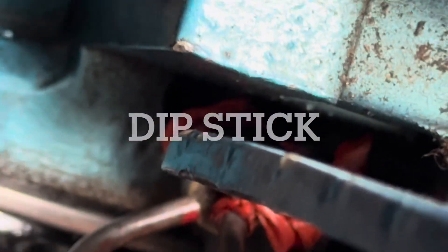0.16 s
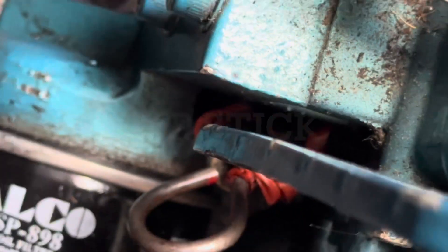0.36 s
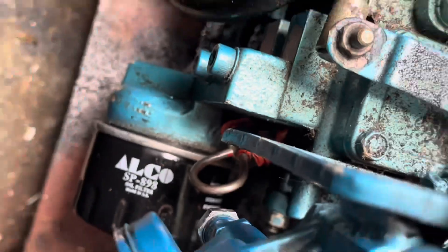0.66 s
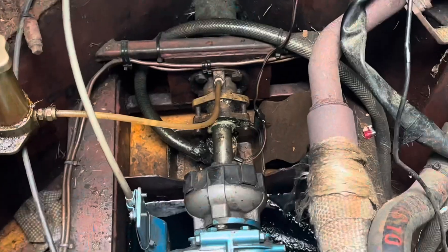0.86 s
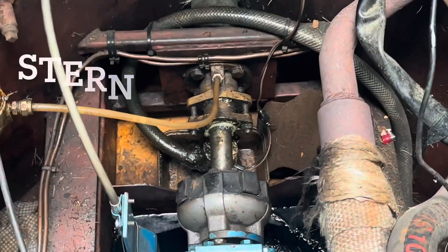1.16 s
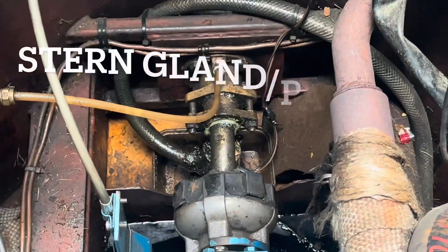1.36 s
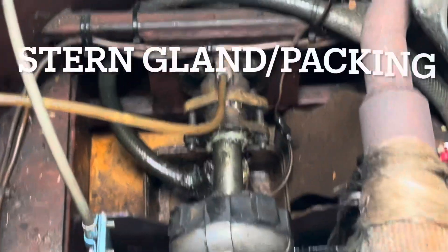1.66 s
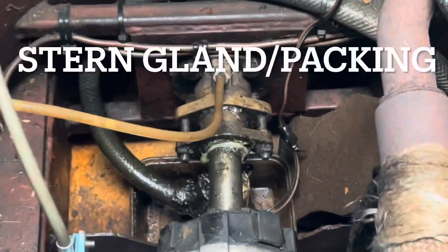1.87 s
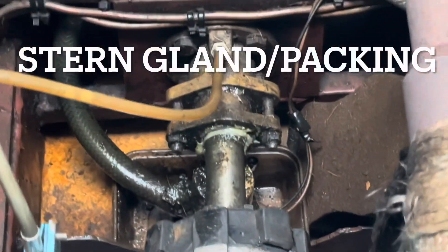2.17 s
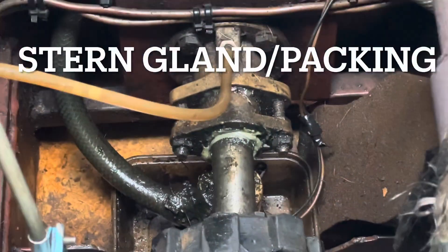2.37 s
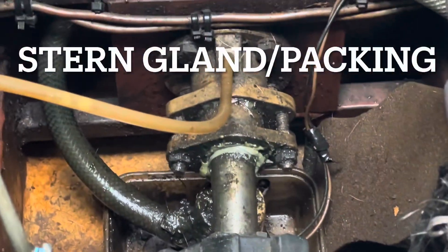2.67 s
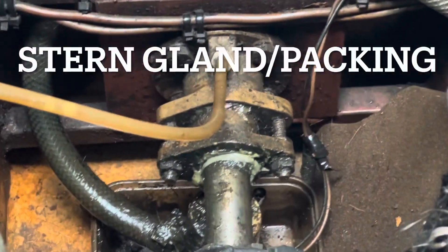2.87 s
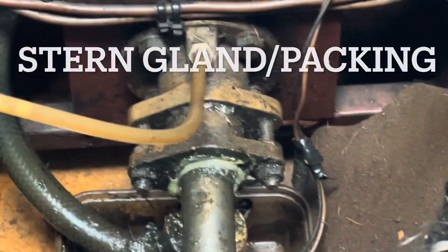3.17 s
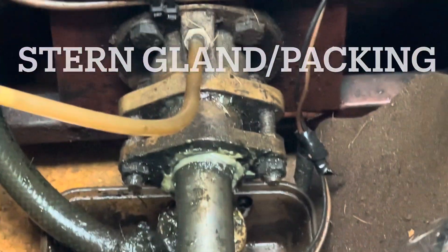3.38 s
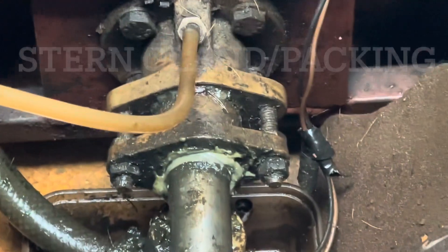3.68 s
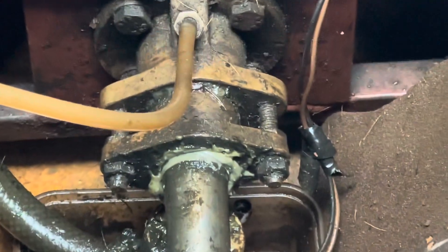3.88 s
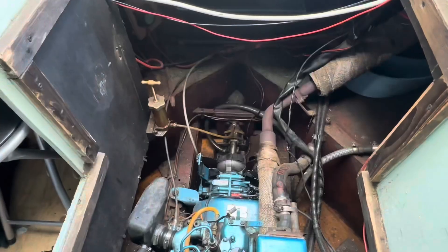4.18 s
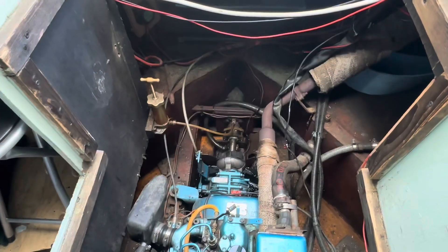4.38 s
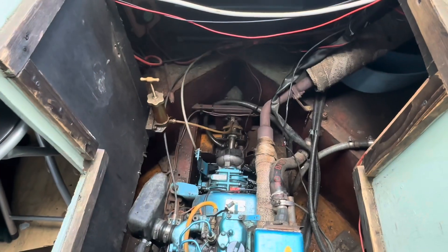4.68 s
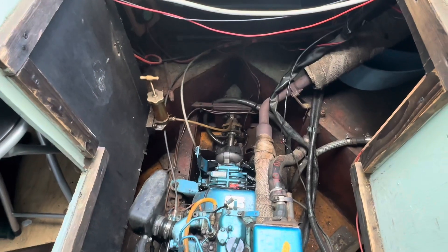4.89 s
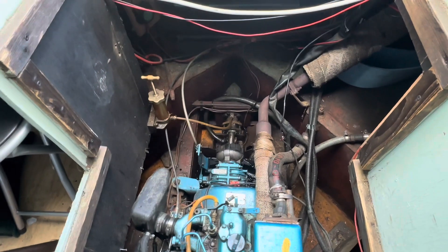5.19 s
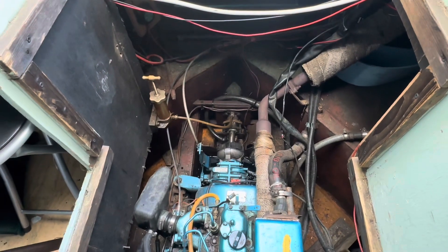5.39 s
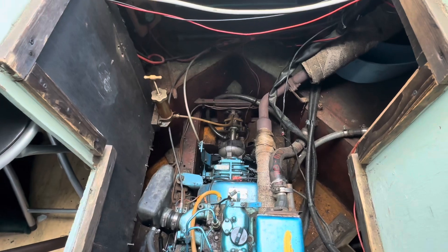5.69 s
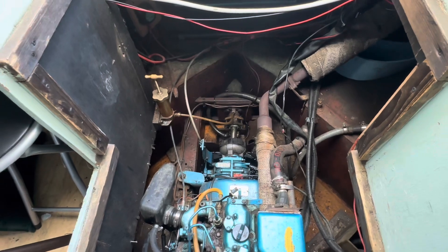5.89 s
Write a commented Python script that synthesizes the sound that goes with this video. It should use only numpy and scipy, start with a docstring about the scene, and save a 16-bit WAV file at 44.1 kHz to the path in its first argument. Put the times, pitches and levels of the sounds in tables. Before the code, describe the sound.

Close stereo microphone in a cramped boat engine bay. A small diesel runs steadily, first booming with dull knocks and bright valve ticks, then abruptly drier and more clattery with faint droning panels. Another cut moves above the hatch, where the engine runs down in slower uneven strokes, whirring, rocking and booming, a loose steel part clanking, before a sinking gear hum and light taps settle almost to silence.

```python
"""In a boat's engine bay a small marine diesel idles, heard beside the block, over the shaft, then from above the hatch.
At idle each beat throbs the hull and fires a set pattern of knocks, rings and valve ticks: filtered noise and modes.
As it stops, the blows spread out over whirr and whine, the engine rocks on its mounts and a loose steel part clanks.
Light taps and a falling hum of the gear lead to rest."""
import sys
import numpy as np
from scipy import signal
from scipy.fft import rfft, irfft
from scipy.io import wavfile
from scipy.ndimage import uniform_filter1d

SR = 44100
rng = np.random.default_rng(int(sys.argv[2]) if len(sys.argv) > 2 else 0)


def store_pcm(level_fs):
    """Save levels as 16-bit WAV."""
    pcm = np.round(np.clip(level_fs, -1, 1) * 32767).astype(np.int16)
    wavfile.write(sys.argv[1], SR, np.atleast_2d(pcm).T)


N = 266787
T = np.arange(N) / SR


def undb(db):
    """Decibels to gain."""
    return 10 ** (np.asarray(db) / 20)


def curve(rows):
    """Each column of a table, joined by straight lines in time."""
    s, *columns = np.transpose(rows)
    return [np.interp(T, s, c) for c in columns]


def unit(x):
    """Scale to rms 1."""
    return x / np.sqrt(np.mean(x ** 2))


def causal(gain):
    """Response of a passive body with these gains: it rings after a blow, never before."""
    cepstrum = irfft(np.log(gain))
    half = len(cepstrum) // 2
    cepstrum[1:half] *= 2
    cepstrum[half + 1:] = 0
    return np.exp(rfft(cepstrum))


def colour(x, points, size=4096):
    """Filter by (frequency [Hz], level [dB]) points, keeping the power of white noise."""
    hz, db = np.transpose(points)
    grid = np.linspace(1, SR / 2, size // 2 + 1)
    grid_db = np.interp(np.log(grid), np.log(hz), db, left=db[0] + 6.5, right=db[-1] - 29.5)
    response = irfft(causal(undb(grid_db)))
    response = response / np.linalg.norm(response)
    return signal.fftconvolve(x, response[None])[:, :N]


def noise(width, size=N):
    """Stereo noise; width is side over mid."""
    mid, side = rng.standard_normal((2, size))
    return np.array([mid + width * side, mid - width * side])


def strike(times, db, response):
    """Lay a response down at each time, into both channels."""
    out, length = np.zeros((2, N + 2 * SR)), response.shape[1]
    for t, gain in zip(times, undb(db)):
        i = int((t + 1) * SR)
        out[:, i:i + length] += gain * response[:, :length]
    return out[:, SR:SR + N]


def rattle(times, db, points, t60, tail_db, tail_t60, rise_s, alike, width):
    """Blows on a casting with countless modes, then the bay's echo; a share of the ring is alike at every blow."""
    t = T[:SR // 3]
    casting = undb(-120 * t / t60)
    echo = undb(2 * tail_db - 120 * t / tail_t60)
    power = (casting + echo) * (1 - np.exp(-t / rise_s)) ** 2
    same = strike(times, db, np.sqrt(power) * noise(width, size=len(t)))
    fresh = np.sqrt(strike(times, 2 * db, power[None])) * noise(width)
    alike = np.clip(alike, 0, 1)
    return colour(np.sqrt(alike) * same + np.sqrt(1 - alike) * fresh, points)


def ring(modes, spread, rise_s):
    """Decaying modes; each reaches the two ears up to spread radians apart."""
    t = T[:SR // 2]
    out = 0
    for k, (hz, db, t60) in enumerate(modes):
        apart = (-1) ** k * spread * np.array([[.5], [-.5]])
        phase = rng.uniform(0, 2 * np.pi) * min(spread, 1) ** 2 + apart
        out = out + undb(db - 60 * t / t60) * np.sin(2 * np.pi * hz * t + phase)
    return out * (1 - np.exp(-t / rise_s)) / np.linalg.norm(undb(np.array(modes)[:, 1]))


def walk(rate):
    """Slow chance with a spread near 1, drawn afresh rate times a second and smoothed."""
    k = int(SR / rate)
    steps = np.repeat(rng.standard_normal(N // k + 1), k)
    return 1.348 * uniform_filter1d(uniform_filter1d(steps, k), k)[:N]


def wavering_tone(hz, wander, rate):
    """A sine whose pitch strays by chance."""
    return np.sin(2 * np.pi * np.cumsum(hz * (1 + wander * walk(rate))) / SR)


def shot(start, end, fade_s=0.029):
    """One listening spot fades in and out."""
    return np.clip(np.minimum(T - start, end - T) / fade_s + .5, 0, 1)


# hull throb at each spot: (multiple of the beat rate, level [dB])
BLOCK_ORDERS = [(1, -37), (2, -33), (3, -19.5), (4, -17), (5, -14), (6, -16), (7, -15), (8, 4.5), (9, -2.5),
                (10, -15.5), (11, -19), (12, -30), (13, -25), (14, -24.5), (15, -38), (16, -40), (17, -40),
                (18, -21), (19, -40), (20, -41)]
SHAFT_ORDERS = [(1, -12.5), (2, -6), (3, 1.5), (4, 6), (5, 2), (6, -10), (7, -3.5), (8, 7), (9, 2.5),
                (10, -10.5), (11, -10), (12, -30.5), (13, 5), (14, -33.5), (15, -12), (16, -9), (17, -10),
                (18, -7), (19, -15), (20, -11)]


def throb(spot, orders, lead_s):
    """One push a beat rings the hull on multiples of the beat rate."""
    _, _, first, period = spot
    multiples, db = np.transpose(orders)
    response = causal(undb(np.interp(np.arange(2 * len(orders)), multiples, db)))
    turns = (T - first + lead_s) / period
    wave = sum((response[k] * np.exp(2j * np.pi * k * turns)).real for k in range(1, len(orders) + 1))
    return unit(wave) * undb(0.91 * walk(5.78))


# dull thuds of the mounts within one beat: (delay [s], pitch [Hz], length [s], level [dB])
BLOCK_THUDS = [(-.009, 434, 0.0053, -35.5), (.029, 277, .007, -38), (0.048, 333, 0.0028, -27),
               (0.057, 262, 0.0051, -48)]
SHAFT_THUDS = [(.033, 262, 0.0031, -40.5), (0.0471, 334, 0.003, -28)]


def thud(times, db, hz, length_s):
    """Soft pushes with hardly any ring: a few cycles under a bell-shaped swell."""
    half = SR // 40
    t = T[:2 * half] - T[half]
    push = -np.cos(2 * np.pi * hz * t) * np.exp(-(t / length_s) ** 2)
    return strike(times - T[half], db, push * np.ones((2, 1)))


# blows within one beat:
# (delay [s], casing level [dB], knock level [dB], ring level [dB], tick level [dB], tick pitch [Hz])
BLOCK_BLOWS = [(-.0005, -39.5, -33.5, -31, -31, 8800), (.007, -49, -64, -30, -42, 6400),
               (0.021, -47.5, -34, -40, -34, 9200), (0.0411, -45, -36, -42, -37, 6000)]
SHAFT_BLOWS = [(-.0005, -44, -46, -27, -36, 8050), (.002, -45.5, -33, -32.5, -32, 6350),
               (0.012, -51.5, -58, -29, -44, 3710), (0.0196, -41, -30.5, -49, -28, 8740),
               (.0232, -41.5, -31.5, -35, -42, 6150), (0.039, -40, -34, -45.5, -32, 4760)]
# beats given a set force, the others draw theirs: (time [s], relative force [dB])
HARD_BEATS = [(.231, 4), (.391, 3), (.55, 3.5), (.63, 3), (.8, 3), (.879, 3), (1.118, 1.5), (1.198, 2.5),
              (1.597, 2), (1.916, 2), (2.075, 4), (2.633, 5), (2.713, 4), (2.793, 4), (2.873, 4),
              (3.032, 4), (3.112, 4), (3.271, 3), (3.351, 4), (3.51, 3), (3.59, 4), (3.67, 4.5),
              (3.83, 3.5), (3.989, 3)]
# colours of the casing at each spot, the knock and the tick: (frequency [Hz], level [dB])
BLOCK_CASING = [(150, -12), (240, -14), (320, -9.5), (450, -10), (600, -7.5), (750, -12), (950, -12),
                (1300, -18.5), (1700, -12.5), (3000, -21)]
SHAFT_CASING = [(150, -8), (250, -9.5), (330, 0), (430, -8.5), (520, -5), (630, -7.5), (730, -12.5),
                (870, -7), (1040, -6), (1300, -15), (1700, -7.5), (3000, -9.5)]
KNOCK = [(800, -34), (1500, -24), (1850, -7.5), (2150, 2.5), (2500, 0.5), (2900, -1), (3600, -3.5),
         (4800, -9.5), (6500, -10.5), (10000, -46)]
TICK = [(2000, -30), (4200, -7.5), (5500, -11.5), (6600, 6.5), (7100, 5), (7450, -32), (7900, 4.5),
        (8900, 9.5), (9700, -3.5), (10500, -19.5), (11500, -24.5), (12900, 1), (15700, -5), (17000, -50)]
# ringing valves, block, piston slap and cover: (frequency [Hz], level [dB], t60 [s])
VALVE_MODES = [(5960, 0, 0.051), (7170, -1, 0.05), (8000, 3.5, 0.03), (9370, 10.5, 0.0093)]
BLOCK_MODES = [(891, -16, 0.22), (1037, -12, 0.23), (1865, 3, 0.05), (2047, -2.5, 0.12), (2227, 1.5, 0.1),
               (2480, -5.5, 0.048), (2780, -5, 0.14), (2960, -6.5, 0.17), (3120, -12, 0.24),
               (3904, -20, 0.33)]
SLAP_MODES = [(1851, 0.5, 0.041), (2030, -3, 0.048), (2062, -1, 0.13), (2172, -9, 0.076)]
COVER_MODES = [(543, -11.5, 0.023), (628, -1, 0.077)]
SLAP_FOLLOW = 2.6  # growth of the piston's slap, dB per dB of force
TAPPET_SCATTER_DB = 1.0


def clatter(spot, blows, casing, thuds, cover_db, slap_db):
    """Combustion and valve gear strike the block at near-fixed points of each beat; some beats knock harder."""
    _, end, first, period = spot
    beats, out = np.arange(first, end, period), 0
    hard_db = sum(db * (abs(beats - t) < period / 2) for t, db in HARD_BEATS)
    force_db = np.where(hard_db > 0, hard_db, 2.8 * rng.standard_normal(len(beats))) - 3.0
    for delay, casing_db, knock_db, ring_db, tick_db, tick_hz in blows:
        chance = rng.standard_normal((len(beats), 4)).T
        times = beats + delay
        loose = times + .00004 * chance[3]
        # the beat's force tells less on blows further from its start
        force = force_db * np.exp(-abs(delay) / 0.038) + 0.64 * chance[0]
        tick = tick_db + 1.27 * chance[2]
        out = out + rattle(times, casing_db + .5 * chance[1], casing, t60=0.024, tail_db=0.0,
                           tail_t60=0.44, rise_s=0.0012, alike=0.78, width=0.56)
        out = out + rattle(loose, knock_db - 3.0 + 0.13 * force, KNOCK, t60=0.037, tail_db=-8.0,
                           tail_t60=0.39, rise_s=0.00057, alike=0.89, width=0.093)
        out = out + rattle(times, tick, TICK, t60=0.02, tail_db=-13,
                           tail_t60=0.14, rise_s=0.00056, alike=1.0, width=0.67)
        # each tappet has a bright band of its own over the ring they share
        own = [(tick_hz * .7, -28), (tick_hz * .92, 0), (tick_hz * 1.05, 0), (tick_hz * 1.18, -30)]
        out = out + rattle(times, tick - 1.5 + TAPPET_SCATTER_DB * chance[1], own, t60=0.018, tail_db=-12,
                           tail_t60=0.092, rise_s=0.00036, alike=0.54, width=0.033)
        out = out + strike(times, tick - 5, ring(VALVE_MODES, spread=0.96, rise_s=0.00014))
        out = out + strike(loose, ring_db - 4.0 + force, ring(BLOCK_MODES, spread=1.0, rise_s=0.00024))
    # the piston's slap is heard mostly on hard beats
    slap = ring(SLAP_MODES, spread=0.48, rise_s=0.0053)
    out = out + strike(beats + 0.002018, slap_db + SLAP_FOLLOW * force_db, slap)
    # each firing rings a cover on the block, and the mounts thud as the engine rocks
    out = out + strike(beats, cover_db + 0.43 * force_db, ring(COVER_MODES, spread=0.41, rise_s=0.0021))
    return out + sum(thud(beats + delay, db + 0.1 * force_db, hz, length) for delay, hz, length, db in thuds)


# panels and covers that sing along over the shaft: (resonance [Hz], level [dB])
SHAFT_TONES = [(263, -48), (313, -55), (351, -58), (414, -57), (464, -68), (489, -64), (551, -60),
               (627, -54.5), (1041, -62), (1104, -64.5)]
DRONE_WAVER_DB = 1.0


def drone(spot, tones):
    """The steady beat keeps each panel singing on the multiple of the beat rate nearest to its resonance."""
    period, out = spot[-1], 0
    for hz, db in tones:
        multiple = np.round(hz * period)
        tone = np.sin(2 * np.pi * (multiple * T / period + rng.random()))
        out = out + undb(db + DRONE_WAVER_DB * walk(4.77)) * tone
    return np.sqrt(2) * out


# idle at each spot: (start [s], end [s], first beat [s], beat period [s])
BESIDE_BLOCK = (-.1, .745, -.0866, .0796)
OVER_SHAFT = (.772, 4.108, .7195, .07974)
# nearness to the shaft end: (time [s], throb level [dB], clatter level [dB])
SHAFT_LEVEL = [(.8, -34, -2.5), (1.5, -33.5, -2), (2.1, -32.5, -1), (2.8, -31.5, -1), (3.5, -32, -0.5),
               (4.1, -32, -0.7)]


def idle():
    """Beside the block one hull resonance booms; over the shaft the clatter stands out."""
    block = throb(BESIDE_BLOCK, BLOCK_ORDERS, lead_s=0.0112) * undb(-21 + np.array([[.8], [-.8]]))
    block += clatter(BESIDE_BLOCK, BLOCK_BLOWS, BLOCK_CASING, BLOCK_THUDS, cover_db=-30.5, slap_db=-27)
    throb_db, clatter_db = curve(SHAFT_LEVEL)
    shaft = clatter(OVER_SHAFT, SHAFT_BLOWS, SHAFT_CASING, SHAFT_THUDS, cover_db=-35, slap_db=-25.5)
    shaft *= undb(clatter_db - 1.5)
    shaft += drone(OVER_SHAFT, SHAFT_TONES) * undb(clatter_db - 2.5)
    shaft -= throb(OVER_SHAFT, SHAFT_ORDERS, lead_s=0.0035) * undb(throb_db)
    return block * shot(*BESIDE_BLOCK[:2]) + shaft * shot(*OVER_SHAFT[:2])


# whirr of the gear as it slows, picks up on the last strokes and stops: (time [s], level [dB])
WHIRR = [(4.14, -40), (4.336, -46), (4.75, -42), (4.99, -47.5), (5.18, -51.5), (5.25, -43), (5.4, -55),
         (5.67, -62), (5.96, -63), (6.05, -61.5)]
# its colour: (frequency [Hz], level [dB])
WHIRR_COLOUR = [(25, -22), (100, 16), (200, -5), (450, 4), (650, 3), (850, 3), (1100, -1), (1550, -7.5),
                (2200, -0.5), (3500, -12), (5500, -21.5), (9000, -18), (11000, -44), (15000, -29)]


def whirr():
    """The turning gear as wide coloured noise."""
    return colour(noise(0.79), WHIRR_COLOUR) * undb(curve(WHIRR)[0] + 7.5)


# the engine heaves against the hull: (time of the peak [s], hull boom level [dB], panel level [dB])
HEAVES = [(4.156, -28, -21.5), (4.252, -34, -18.5), (4.34, -26.5, -23), (4.485, -28.5, -32),
          (4.605, -38, -24.5), (4.705, -17, -26), (4.87, -17.5, -30), (4.935, -26, -33), (5.09, -29.5, -33),
          (5.24, -24.5, -44), (5.319, -20, -33), (5.47, -35.5, -36), (5.61, -34, -43), (5.735, -32, -28),
          (5.81, -63, -31)]
HEAVE_RISE_DB_PER_S, HEAVE_HOLD_S = 509, 0.014


def heave(db, fall_db_per_s):
    """Each heave swells quickly, holds and dies away."""
    power = 0
    for (peak, _, _), level in zip(HEAVES, db):
        shape = np.minimum(HEAVE_RISE_DB_PER_S * (T - peak), fall_db_per_s * (peak + HEAVE_HOLD_S - T))
        power = power + undb(level + np.minimum(shape, 0)) ** 2
    return np.sqrt(power)


def sway(hz, wander):
    """A low resonance kept swinging by uneven pushes."""
    return unit(wavering_tone(hz, wander, rate=35))


# swing on the mounts: (time [s], level [dB])
SWING = [(4.14, -22.5), (4.702, -30.5), (4.974, -26), (5.244, -51), (5.41, -22.5), (5.654, -45),
         (5.75, -26), (5.792, -57), (6.05, -54)]
# rumble of the bay's panels: (time [s], level [dB])
RUMBLE_LEVEL = [(4.14, -41.5), (4.92, -34), (5.144, -43.5), (5.154, -48.5), (5.308, -29.5), (5.488, -43.5),
                (5.76, -45.5), (5.97, -57), (6.04, -49)]
# colour of the rumble from above the hatch: (frequency [Hz], level [dB])
RUMBLE = [(90, -7), (135, -7.5), (165, 1.5), (205, -2.5), (250, -5), (350, -12.5), (430, -16.5),
          (700, -26.5)]
# higher resonances of the bay's panels: (frequency [Hz], level [dB])
PANEL_TONES = [(163, 2.5), (210, -3), (289, -3.5), (356, -5)]
PANEL_FOLLOW = 0.8  # the panels ring on, so they fade less than the rumble


def rocking():
    """The slowing engine swings on its mounts and sets hull and panels booming."""
    _, boom_db, panel_db = np.transpose(HEAVES)
    rumble_db = curve(RUMBLE_LEVEL)[0]
    lows = sway(38, wander=0.0853) * undb(curve(SWING)[0] - 5.5)
    lows += sway(73, wander=0.0325) * heave(boom_db - 4.0, fall_db_per_s=107)
    lows += sway(108, wander=0.0384) * heave(panel_db - 5.0, fall_db_per_s=114)
    lows = lows + colour(noise(0.13), RUMBLE) * undb(rumble_db + 1.0)
    # the lows fall away below about 28 Hz
    lows = signal.sosfiltfilt(signal.butter(4, 28, "high", fs=SR, output="sos"), lows)
    panels = sum(undb(db + 4.1 * walk(26)) * sway(hz, wander=0.02606) for hz, db in PANEL_TONES)
    return lows + unit(panels) * undb(PANEL_FOLLOW * rumble_db - 11.5)


# a brief whine that sags as the engine starts to slow: (time [s], pitch [Hz], level [dB])
WHINE = [(4.15, 900, -55), (4.2, 875, -37), (4.28, 840, -51), (4.38, 800, -42), (4.46, 770, -75)]


def whine():
    """A wavering tone that sinks with the speed."""
    hz, db = curve(WHINE)
    return wavering_tone(hz, 0.0123, rate=40) * undb(db)


# strokes of the slowing engine: (time [s], spread of the blows [s], level [dB], thud level [dB])
STROKES = [(4.1583, 0.042, 0.5, -15.5), (4.2604, 0.049, 1.5, -17), (4.3686, 0.058, 1, -20.5),
           (4.488, 0.06, 2, -18.5), (4.6274, 0.074, 0, -23), (4.7853, .0855, 1, -21.5),
           (4.977, 0.095, -0.5, -35), (5.2154, 0.11, -3, -32)]
# three blows in every stroke: (share of the spread, knock level [dB], its change [dB per halving of speed],
# tick level [dB], its change [dB per halving of speed])
STROKE_BLOWS = [(0, -32, 1.5, -65.5, 22), (0.578, -34.5, 4, -45.5, 8), (0.998, -34, -7.5, -38, -5.5)]
# the loose steel part strikes: (time [s], level [dB])
CLANKS = [(4.492, -20), (4.5285, -18.5), (4.572, -23), (4.6605, -11.5), (4.701, -15), (4.7475, -20),
          (4.7861, -16), (4.8219, -13), (4.8637, -13.5), (4.9067, -17.5), (5.009, -21), (5.063, -22),
          (5.199, -18.5), (5.25, -21.5), (5.285, -12.5), (5.301, -26), (5.5786, -26)]
CLANK_KNOCK_DB, CLANK_TICK_DB = -21.5, -32.5  # crack of the contact, added to the clank's level
# light taps as the engine settles: (time [s], knock level [dB], tick level [dB], body level [dB])
TAPS = [(5.3824, -47, -49, -42), (5.446, -58, -57.5, -56), (5.491, -50, -63, -45.5),
        (5.5644, -40.5, -72, -51), (5.605, -62, -59, -44.5), (5.6284, -70, -57, -66),
        (5.6855, -56, -81, -54), (5.7194, -50, -61.5, -46.5), (5.8266, -53.5, -76, -46.5),
        (5.875, -49.5, -78, -47.5), (5.989, -55, -72, -60), (6.018, -57, -76, -50)]


def slowing_blows():
    """Blows of a stroke spread out as speed falls, and the sharpest tick moves to the front; clanks and taps join."""
    start, spread, level, _ = np.transpose(STROKES)
    halvings = np.log2(spread / spread[0])
    rows = []  # (time [s], knock level [dB], tick level [dB])
    for share, knock, knock_change, tick, tick_change in STROKE_BLOWS:
        knock_db = level + knock + knock_change * halvings
        tick_db = level + tick + tick_change * halvings
        rows.append(np.column_stack([start + share * spread, knock_db, tick_db]))
    contacts = [(t, db + CLANK_KNOCK_DB, db + CLANK_TICK_DB) for t, db in CLANKS]
    return np.vstack(rows + [contacts, np.array(TAPS)[:, :3]])


# knocks and valve ticks from above the hatch: (frequency [Hz], level [dB])
OPEN_KNOCK = [(400, -21.5), (800, 5), (1600, -4.5), (2200, 5.5), (2800, -0.5), (3700, -0.5), (5000, -12),
              (7000, -21.5), (10500, -24)]
OPEN_TICK = [(2000, -15), (4200, -0.5), (6500, -5.5), (7450, -7.5), (8600, -1.5), (9700, -5.5),
             (10500, -23), (11500, -32), (12900, -13), (15800, -20), (17000, -42)]


def slowing_clatter():
    """Each blow is a knock of the casting with a brighter valve tick on top."""
    times, knock_db, tick_db = slowing_blows().T
    knocks = rattle(times, knock_db - 2.5, OPEN_KNOCK, t60=0.18, tail_db=-0.5,
                    tail_t60=0.2, rise_s=0.00093, alike=0.2, width=0.99)
    ticks = rattle(times, tick_db + 4.0, OPEN_TICK, t60=0.12, tail_db=-5.5,
                   tail_t60=0.19, rise_s=0.00034, alike=0.091, width=0.77)
    return knocks + ticks


# the bay's ring after a thud: (frequency [Hz], level [dB], t60 [s])
BAY_MODES = [(300, -16, 0.077), (320.5, 10, 0.071), (357, 4.5, 0.13), (554, -6.5, 0.077), (847, -12, 0.39)]


def stroke_thuds():
    """A dull thud follows the last blow of each stroke and rings the bay."""
    start, spread, _, thud_db = np.transpose(STROKES)
    times = start + STROKE_BLOWS[-1][0] * spread + 0.00387
    return strike(times, thud_db + 1.0, ring(BAY_MODES, spread=0.26, rise_s=0.0089))


# ringing steel, then the bright first instant of a clank: (frequency [Hz], level [dB], t60 [s])
STEEL_MODES = [(966, -17, 0.2), (986, -5.5, 0.19), (999, -3, 0.21), (1064, 2, 0.13), (1081, -6, 0.17),
               (1100, -1, 0.23), (1161, 0, 0.16), (1164, -1.5, 0.17), (1250, -5, 0.14), (1274, -1.5, 0.22),
               (1317, -3.5, 0.18), (1358, -5, 0.14), (1430, -15, 0.11)]
STEEL_STRIKE = [(994, -4, 0.0094), (1110, 1, 0.017), (1170, 1, 0.013), (1268, 4, 0.026)]
# the strike comes straight and off two walls of the bay: (delay [s], level [dB])
CLANK_PATHS = [(.0005, 1.5), (.011, -6), (.0175, -2.5)]


def clanks():
    """Loose steel rings in close-set modes that build slowly behind a bright contact."""
    times, db = np.transpose(CLANKS)
    out = strike(times, db - 1.5, ring(STEEL_MODES, spread=1.59, rise_s=.008))
    for delay, path_db in CLANK_PATHS:
        out += strike(times + delay, db + path_db - .5, ring(STEEL_STRIKE, spread=0.6, rise_s=.001))
    return out


# hum of the gear as it coasts to rest: (time [s], pitch [Hz], level [dB])
COAST_HUM = [(5.25, 399.6, -55), (5.35, 352.6, -39.5), (5.46, 321.8, -37.5), (5.56, 275.3, -51),
             (5.66, 241, -38.5), (5.73, 209, -41), (5.84, 191.7, -54), (6.0, 166, -74)]
PANEL_T60_S = 0.33


def coasting():
    """The hum of the gear falls through the resonances of the panels, and each rings on after it."""
    hz, db = curve(COAST_HUM)
    hum = wavering_tone(hz, 0.0292, rate=30) * shot(COAST_HUM[0][0], np.inf)
    panels = ring([(f, level, PANEL_T60_S) for f, level in PANEL_TONES], spread=0.52, rise_s=0.0024)
    rung = signal.fftconvolve(hum[None], panels)[:, :N]
    return (0.81 * hum + 2.7 * rung / abs(rung).max()) * undb(db)


# hollow body of a light tap: (frequency [Hz], level [dB])
TAP_BODY = [(200, -7), (300, -1), (400, -18), (500, 6), (620, 0), (750, -5), (1100, -4), (1500, -8),
            (2500, -20)]


def tap_bodies():
    """The hollow body under each light tap, as low coloured noise."""
    times, _, _, body_db = np.transpose(TAPS)
    return rattle(times, body_db + 1.0, TAP_BODY, t60=0.15, tail_db=-5.5,
                  tail_t60=0.25, rise_s=0.0017, alike=0.62, width=1.0)


HATCH_START_S, PORT_LAG_S = 4.13, .0005


def run_down():
    """Ever slower blows over whirr, whine and hum, as the engine rocks and the loose steel part clanks."""
    out = whirr() + slowing_clatter() + tap_bodies()
    # the engine lies a little to the left, so its clatter reaches the right ear later
    out[1] = np.interp(T - PORT_LAG_S, T, out[1])
    out += rocking() + whine() + stroke_thuds() + clanks() + coasting()
    return out * undb(np.array([[.45], [-.45]])) * shot(HATCH_START_S, np.inf)


def scene():
    """Idle, then the stop."""
    return idle() + run_down()


def record(dry):
    """The microphone cuts the top, above 16.3 kHz."""
    return signal.sosfilt(signal.ellip(8, .2, 70, 16300, fs=SR, output="sos"), dry)


dry = scene()
out = record(dry)
store_pcm(out)
```